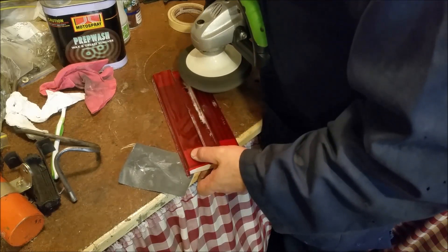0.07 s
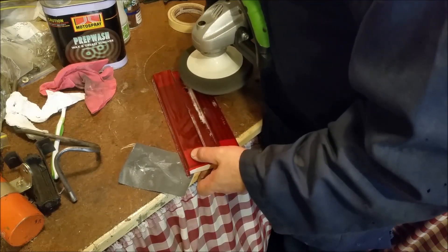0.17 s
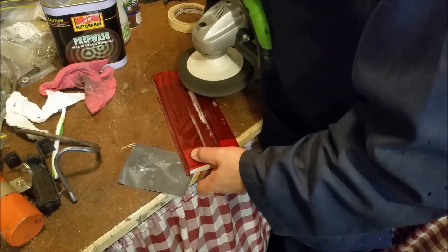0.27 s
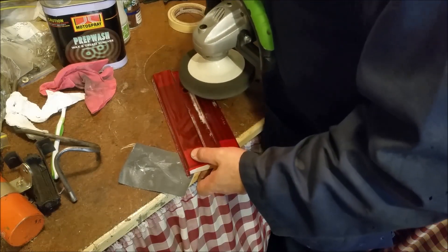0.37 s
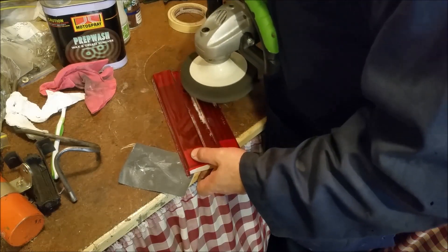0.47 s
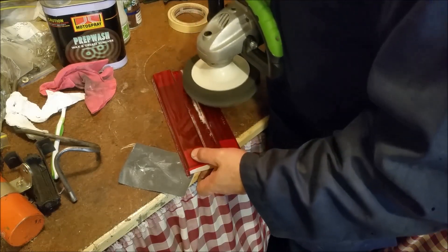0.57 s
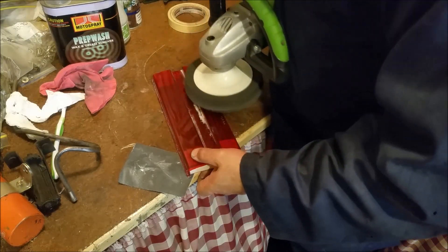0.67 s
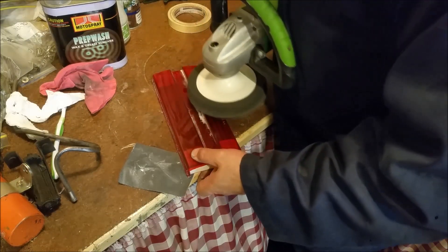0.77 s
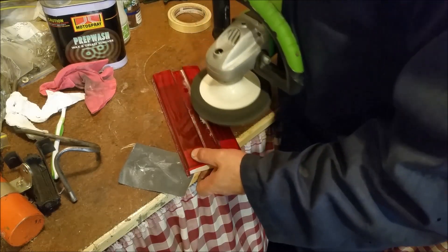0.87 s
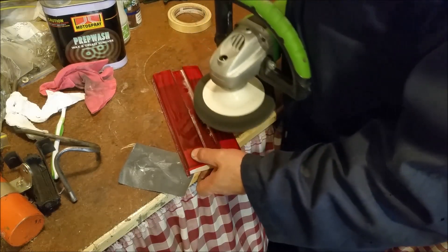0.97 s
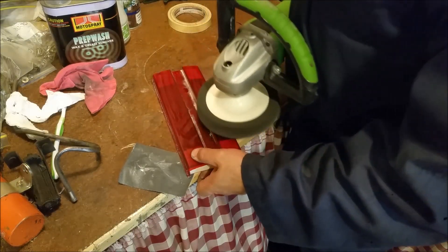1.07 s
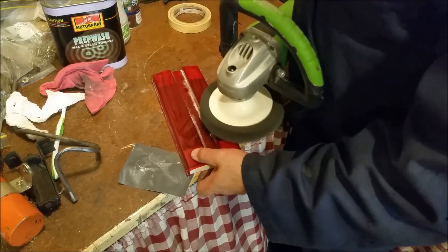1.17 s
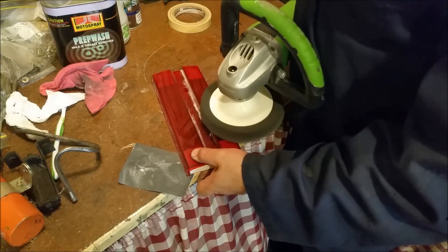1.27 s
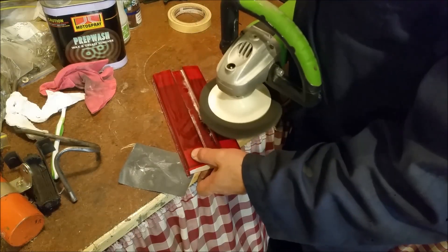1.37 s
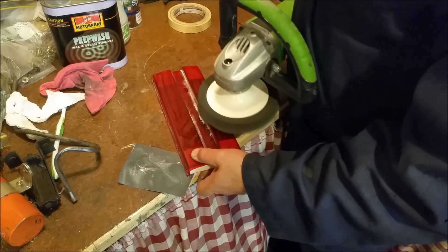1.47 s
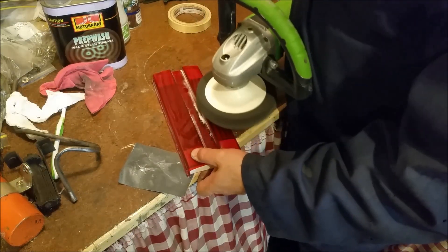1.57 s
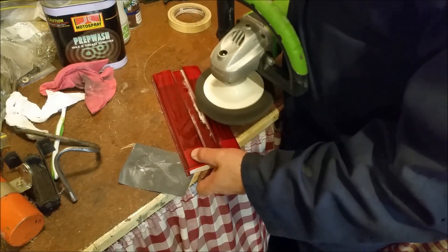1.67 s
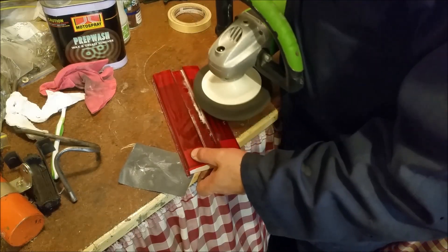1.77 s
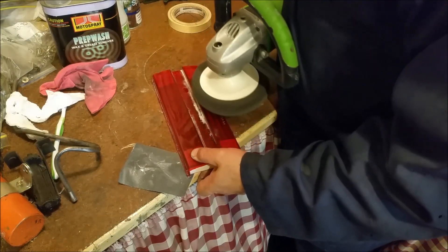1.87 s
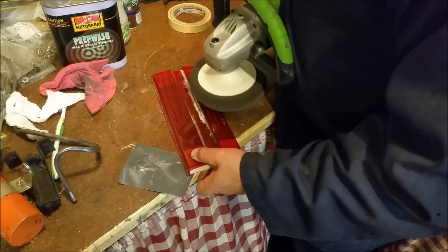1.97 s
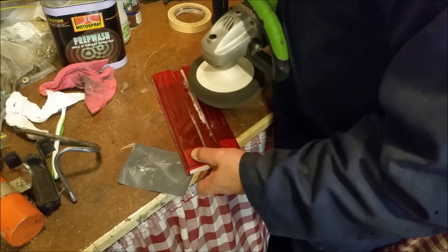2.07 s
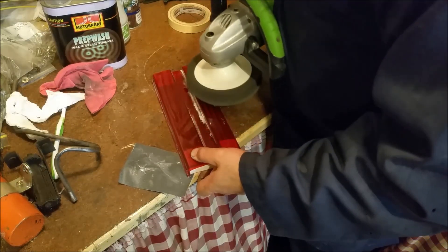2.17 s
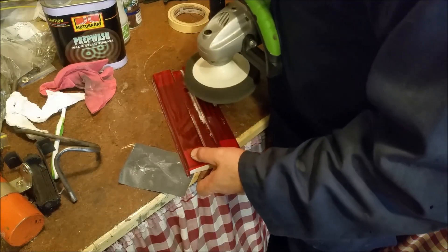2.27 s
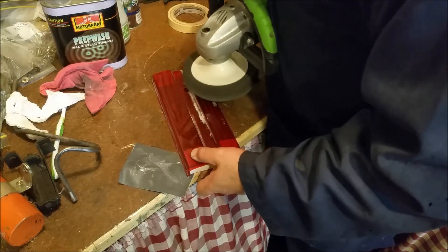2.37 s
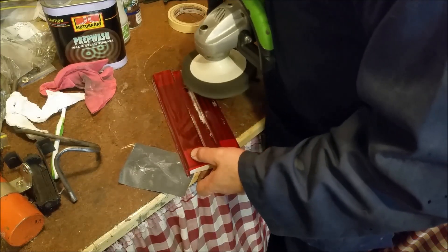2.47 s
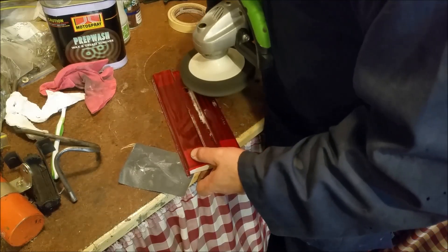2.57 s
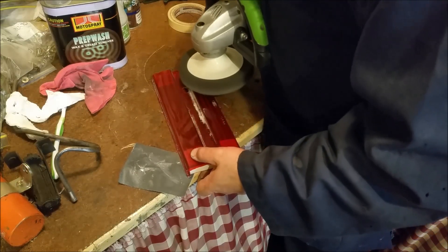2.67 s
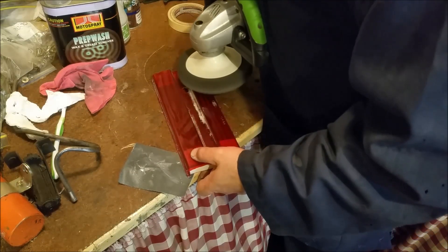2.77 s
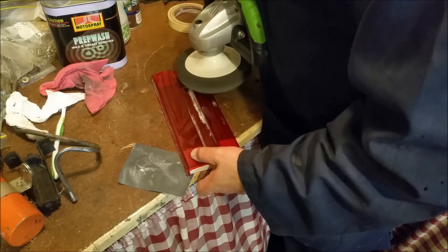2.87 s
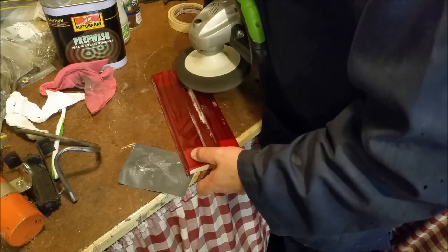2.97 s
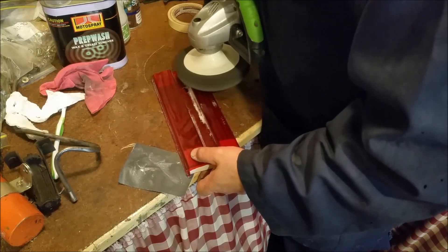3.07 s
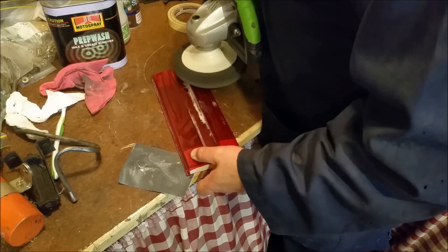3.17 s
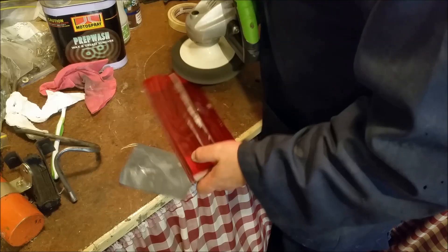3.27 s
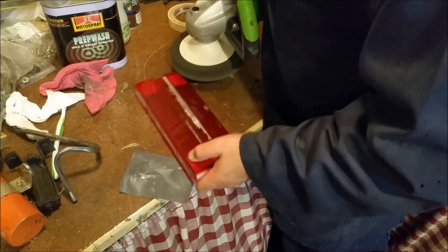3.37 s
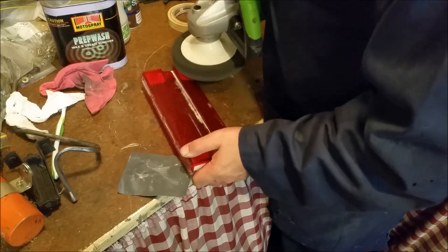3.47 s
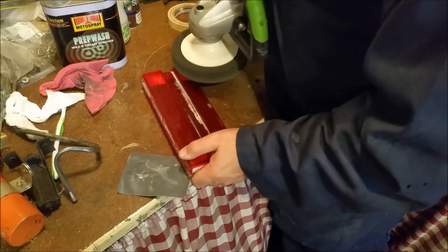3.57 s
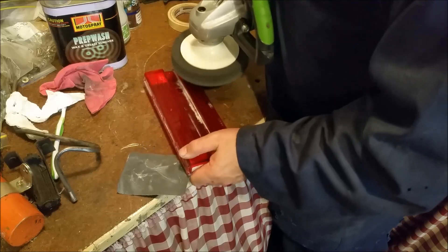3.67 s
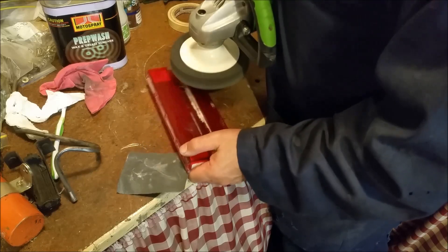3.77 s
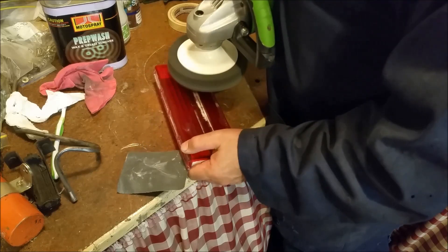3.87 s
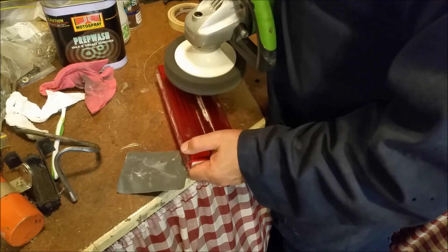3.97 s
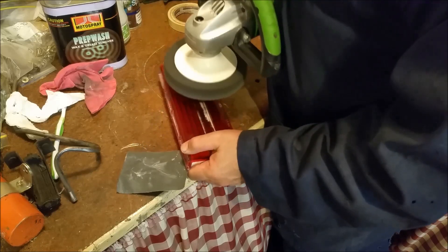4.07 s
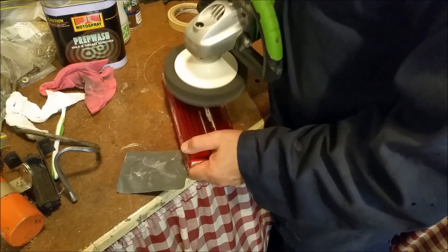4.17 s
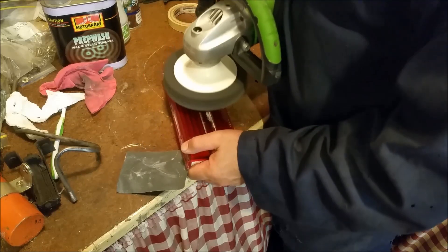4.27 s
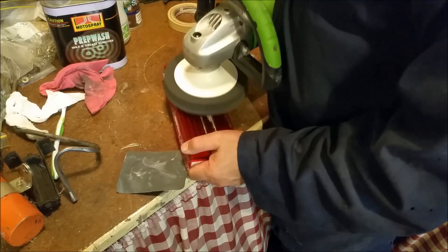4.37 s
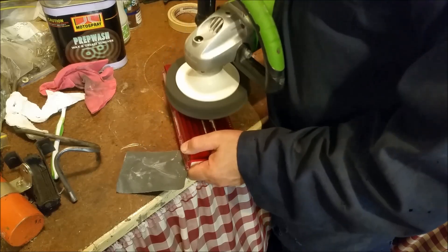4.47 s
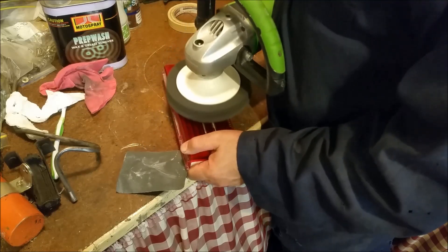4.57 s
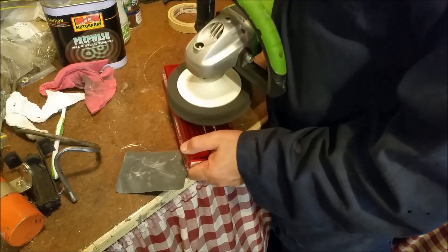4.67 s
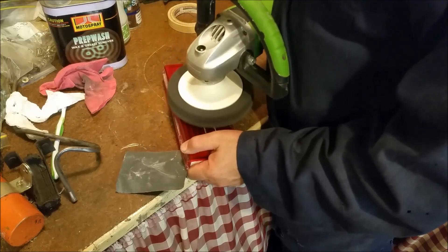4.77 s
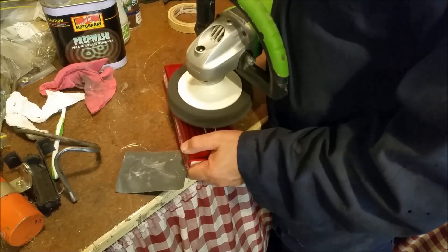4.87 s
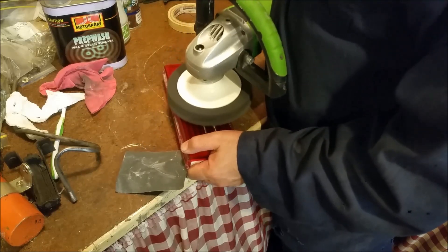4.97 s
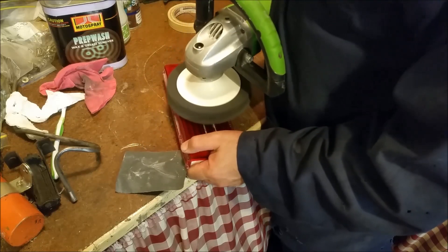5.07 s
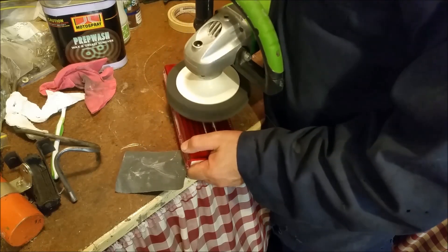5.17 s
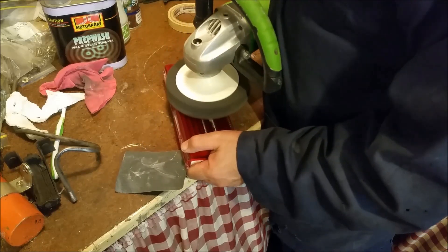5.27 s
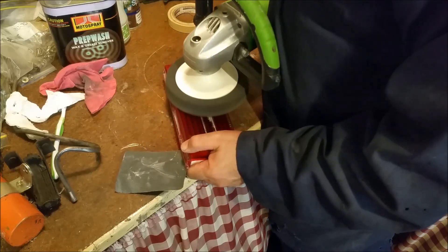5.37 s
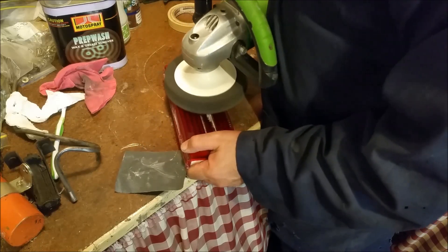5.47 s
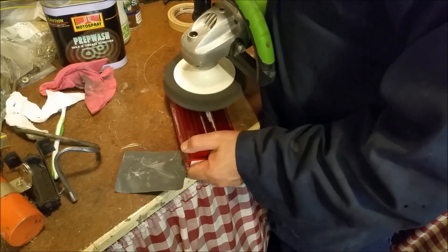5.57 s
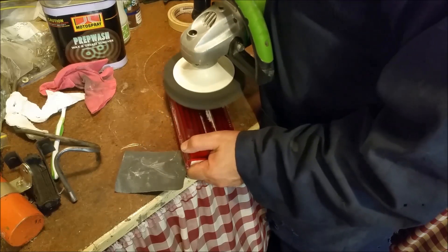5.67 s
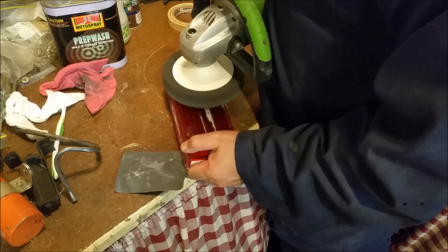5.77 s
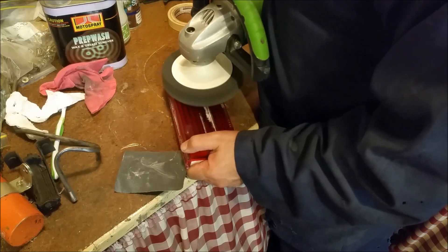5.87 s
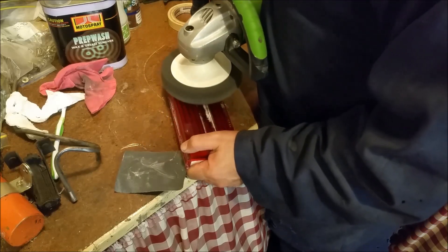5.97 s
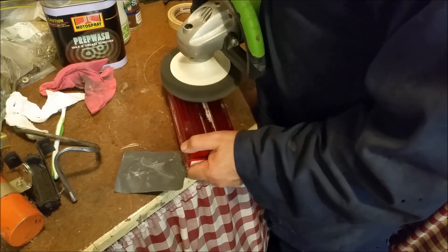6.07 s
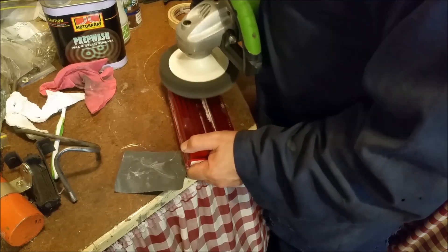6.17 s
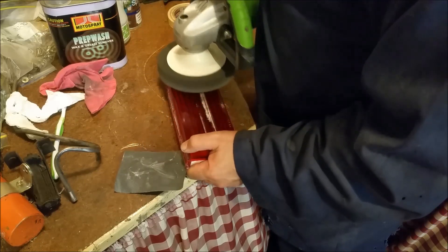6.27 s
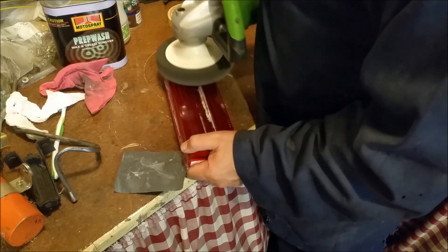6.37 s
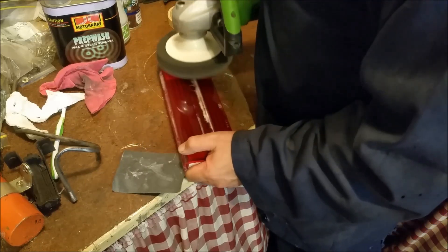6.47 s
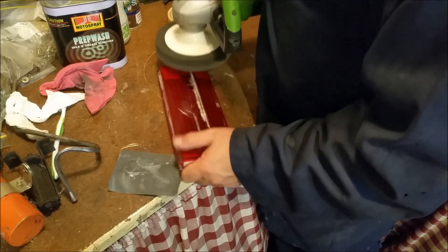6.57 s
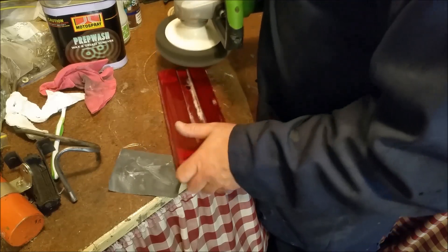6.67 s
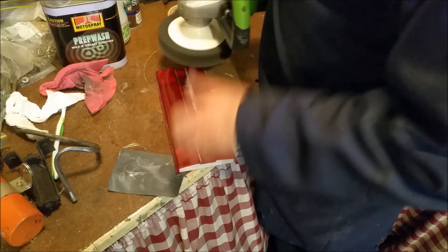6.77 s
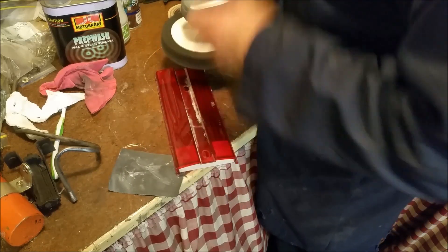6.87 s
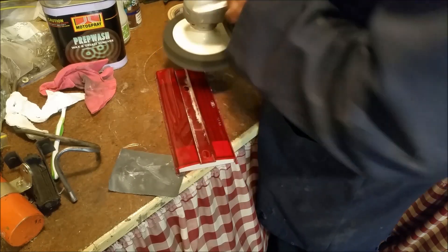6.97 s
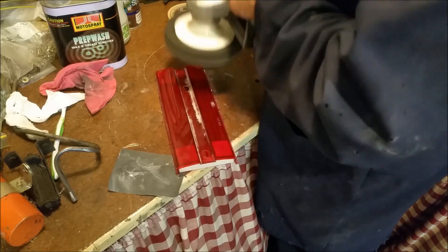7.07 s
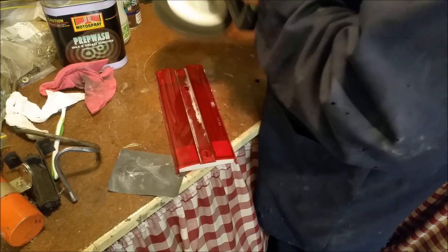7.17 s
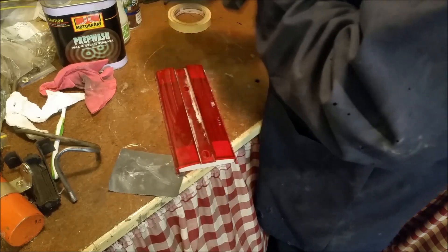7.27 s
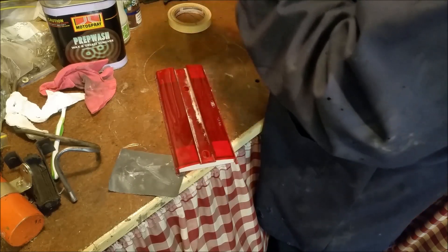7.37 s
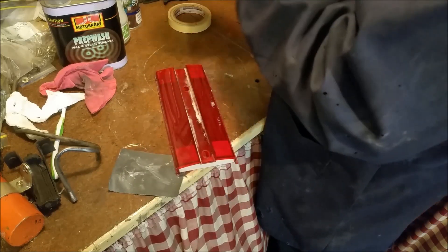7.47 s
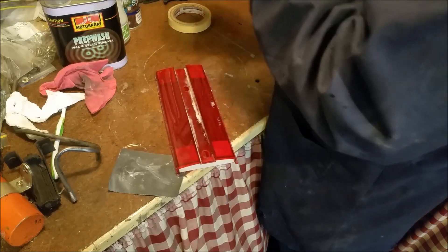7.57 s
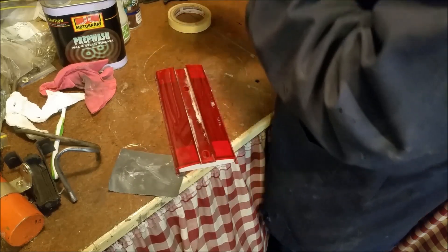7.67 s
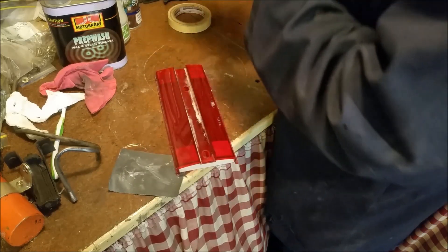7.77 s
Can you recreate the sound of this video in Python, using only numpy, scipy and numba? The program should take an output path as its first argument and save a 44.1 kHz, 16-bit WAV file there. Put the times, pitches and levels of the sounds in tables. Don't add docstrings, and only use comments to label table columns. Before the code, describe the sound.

Close, steady motor whine and airy buzz of a polisher, sped up midway, ending with sharp plastic knocks, ticking gears and a falling whirr.

```python
import sys
import numpy as np
from scipy import signal
from scipy.fft import rfft, irfft
from scipy.io import wavfile
from scipy.ndimage import uniform_filter1d
from numba import njit

SR = 44100
rng = np.random.default_rng(int(sys.argv[2]) if len(sys.argv) > 2 else 0)


def transcribe(u):
    v = np.clip(np.atleast_2d(u).T, -1, 1)
    q = np.round(v * 32767).astype(np.int16)
    wavfile.write(sys.argv[1], SR, q)


def gain_from_decibels(decibels):
    exponent = np.asarray(decibels, float) / 20
    return 10 ** exponent


N = 345303
T = np.arange(N) / SR
GRID = np.arange(int(T[-1] * 200) + 2) / 200

FAST_S, PRESS_S, OFF_S = 3.41, 4.44, 6.80
MAINS_HZ = 49.93
# t/s, level/dB
COAST_LEVEL = [(6.8, -31.5), (6.85, -27), (6.96, -34.5), (7.13, -37), (7.2, -42), (7.28, -40.5),
               (7.54, -42), (7.79, -48.5), (7.83, -47)]


def level(x, db):
    return x * gain_from_decibels(db) / np.sqrt(np.mean(x ** 2))


def across(table):
    hz, value = np.transpose(table)
    return np.interp(np.log(np.arange(N // 2 + 1) * SR / N + 1), np.log(hz), value)


def tint(x, gain):
    return irfft(rfft(x) * gain, N)


def walk(rate, count=1):
    k = max(int(200 / rate), 1)
    steps = uniform_filter1d(rng.standard_normal((count, len(GRID))), k)
    return uniform_filter1d(steps, k) * np.sqrt(1.5 * k)


def fine(coarse):
    return np.interp(T, GRID, coarse)


def bell(x, centre, width):
    return np.exp(-((x - centre) / width) ** 2)


def pair_noise():
    # f/Hz, left-right likeness/0-1
    likeness = [(60, 0.6), (130, 0.85), (290, 0.97), (640, 0.97), (1410, 0.3), (3100, 0.05), (6820, 0.04),
                (15000, -0.01)]
    like = np.clip(across(likeness), 0, 1)
    mid, side = rng.standard_normal((2, N)) * np.sqrt(SR / 4)
    mid = tint(mid, np.sqrt(1 + like))
    side = tint(side, np.sqrt(1 - like))
    return np.array([mid + side, mid - side])


@njit
def sing(turns, order, size, shift):
    out = np.empty((2, len(turns)))
    for c in range(2):
        for i in range(len(turns)):
            place = i * 200 / SR
            k = int(place)
            u = place - k
            phase = 2 * np.pi * order * turns[i] + shift[c, k] + u * (shift[c, k + 1] - shift[c, k])
            out[c, i] = (size[c, k] + u * (size[c, k + 1] - size[c, k])) * np.sin(phase)
    return out


def line(turns, order, db, fade_db, lag):
    wander = walk(6, count=4)
    ear = np.array([[1.], [-1.]])
    size = np.sqrt(2) * gain_from_decibels(db + fade_db * wander[1] + ear * .9 * wander[2])
    shift = .3 * wander[0] + ear * (lag + .13 * fade_db * wander[3])
    return sing(turns, float(order), size, shift)


def shaft():
    # t/s, shaft f/Hz
    speed = [(0.0, 159.4), (0.4, 162.1), (1.02, 169.8), (1.53, 172.3), (2.04, 170.3), (2.55, 164.4),
             (2.97, 160.9), (3.23, 161.4), (3.34, 164.2), (3.51, 176.1), (3.91, 197.0), (4.42, 212.1),
             (4.76, 213.5), (5.27, 203.9), (5.86, 194.4), (6.38, 189.7), (6.63, 194.8), (6.79, 200.0)]
    s, hz = np.transpose(speed)
    slope = np.gradient(hz, s, edge_order=2)
    i = np.clip(np.searchsorted(s, T) - 1, 0, len(s) - 2)
    h = s[i + 1] - s[i]
    u = np.clip((T - s[i]) / h, 0, 1)
    rise = hz[i + 1] - hz[i]
    bend = (1 - u) * (slope[i] * h - rise) - u * (slope[i + 1] * h - rise)
    powered = (1 - u) * hz[i] + u * hz[i + 1] + u * (1 - u) * bend
    since = np.clip(T - s[-1], 0, None)
    coast = 203.7 - 75.7 * since + 7.5 * since ** 2
    return np.where(since > 0, np.minimum(powered, coast), powered)


def whine(turns, hz, effort_db):
    sung = [(1, -63, -59.5, -61, -67), (9, -38, -54, -50.5, -48), (15, -35, -57, -42.5, -61),
            (18, -41, -46, -36.5, -59), (19, -39.5, -54, -49, -63), (21, -37, -62, -42, -65),
            (24, -35, -38, -39.5, -40), (28, -43.5, -54, -35, -68), (30, -41, -46, -40, -66)]
    # f/Hz, width/Hz, level/dB
    housing = [(1559, 57, 8), (2470, 42, 5), (2567, 46, 7.5), (2962, 56, 10.5), (3065, 40, 6),
               (3635, 28, 6.5), (3794, 71, 6), (4268, 88, 13), (4102, 80, 6), (4440, 80, 9.5),
               (4462, 95, 3.5), (4530, 41, 10), (4950, 50, 5), (5076, 48, 6)]
    lags = (.05, .5, .15, .1, .3, -.3, .55, -.5, .5)
    lift_s, release_s = 3.38, 6.6
    edge_hz, edge_db_per_khz = 5060, -25
    beat_s, beat_first_s, beat_db = .19, 7.045, -10
    coast_s, coast_db = COAST_LEVEL[2]
    at = [lift_s - .15, lift_s + .17, PRESS_S - .15, PRESS_S + .17,
          release_s - .08, release_s + .07, OFF_S, OFF_S + .15]
    speed = np.interp(GRID, T, hz)
    fading = np.interp(GRID, T, effort_db) - coast_db
    powered, coasting = GRID < OFF_S, GRID > coast_s
    out = np.zeros((2, N))
    for (order, slow, lifted, pressed, coast), lag in zip(sung, lags):
        db = np.interp(GRID, at, [slow, lifted, lifted, pressed, pressed, lifted, lifted, coast])
        pitch = order * speed
        swell = sum(g * bell(pitch, centre_hz, width) for centre_hz, width, g in housing)
        db += swell * np.where(powered, 1, .4)
        db += edge_db_per_khz * np.clip(pitch - edge_hz, 0, None) / 1000 * powered
        db += .12 * fading * coasting
        beat = np.cos(np.pi * (GRID - beat_first_s) / beat_s) ** 8
        db += beat_db * (order > 13.5) * coasting * beat
        out += line(turns, order, db, .8, lag)
    return out


def machine(turns, noise_db, rumble_db, hiss_db):
    lesser = [(3, 9, 16, 9), (4, 12, 17, 11), (6, 14, 17, 13), (7, 9, 20, 9), (11, 18, 23, 14),
              (13, 14, 17, 20), (14, 16, 16, 19), (16, 17, 9, 20), (17, 13, 18, 12), (20, 20, 20, 16),
              (22, 9, 15, 18), (23, 13, 16, 19), (25, 21, 15, 21), (27, 19, 18, 21), (29, 20, 15, 15),
              (31, 18, 23, 17), (32, 16, 24, 16), (33, 20, 16, 18), (36, 19, 17, 24), (39, 17, 13, 19),
              (41, 21, 20, 14), (42, 20, 19, 9), (48, 18, 25, 26), (53, 12, 14, 19), (57, 18, 14, 16),
              (58, 9, 13, 21), (60, 16, 20, 20), (62, 19, 22, 14), (63, 14, 14, 20), (72, 19, 19, 19)]
    # f/Hz, density/dB per Hz
    colour = [(24, -67), (40, -40.5), (71, -49), (179, -25.5), (247, -31), (417, -14.5), (548, -16.5),
              (1020, -10.5), (1770, -6.5), (2330, 1.5), (3380, -8), (4680, -2), (6000, -23), (11500, -26.5),
              (15500, -39)]
    # f/Hz, level/dB
    top_edge = [(4400, 0.5), (5150, 2), (5600, -1.5), (6300, -1)]
    source = pair_noise()
    lags = rng.uniform(-1.2, 1.2, len(lesser))
    at = [FAST_S - .1, FAST_S + .12, OFF_S, OFF_S + .15]
    for (order, slow, fast, coast), lag in zip(lesser, lags):
        db = np.interp(GRID, at, [slow, fast, fast, coast + .79])
        source += line(turns, order, db + 1.5 - order / 16, 2 + order / 25, lag)
    body = gain_from_decibels(across(colour) + across(top_edge))
    low = np.clip(across([(1300, 1), (2000, 0)]), 0, 1)
    high = np.clip(across([(5200, 0), (6200, 1)]), 0, 1)
    bass = np.clip(across([(110, 1), (170, 0)]), 0, 1)
    flutter = .6 * walk(9, count=3) + .4 * walk(4)
    air = level(tint(source, body * (1 - low - high)), .63)
    rumble = level(tint(source, body * (low - bass)), .24)
    hiss = level(tint(source, body * high), 2.02)
    bench = level(tint(source, body * bass), -62.5)
    bench_db = np.interp(T, [FAST_S - .2, FAST_S + .2, OFF_S, OFF_S + .45], [0, -5.5, -8, -19])
    out = air * gain_from_decibels(noise_db + fine(flutter[0]))
    out += rumble * gain_from_decibels(rumble_db + fine(flutter[1]))
    out += bench * gain_from_decibels(bench_db)
    return out + hiss * gain_from_decibels(hiss_db + 1.03 * fine(flutter[2]))


def stator(turns, ring_db):
    # f/Hz, width/Hz, level/dB
    modes = [(2386, 89, 8), (2390, 100, -21), (2055, 40, -8), (2090, 27, -18)]
    slots, fire_s = 12, 4.0072
    cycle = (T - fire_s) * MAINS_HZ
    half = (2 * cycle) % 1
    pull = np.exp(-half / .19) * (1 - np.exp(-half / .11)) * np.where(cycle % 1 < .5, 1, .66)
    pull = np.where(T < OFF_S, pull * gain_from_decibels(fine(1.2 * walk(30)[0])), .04)
    drive = pull * np.cos(2 * np.pi * slots * turns + fine(.1 * walk(20)[0]))
    ring = np.zeros(N)
    for hz, width, db in modes:
        ring += gain_from_decibels(db) * signal.lfilter(*signal.iirpeak(hz, hz / width, SR), drive)
    ring /= np.sqrt(uniform_filter1d(ring ** 2, int(.12 * SR)) + 1e-9)
    ring *= gain_from_decibels(ring_db - 1.5 + (T > OFF_S) * fine(3 * walk(9)[0]))
    return np.array([ring, np.roll(ring, 1)])


def hum():
    overtones = [(6, -60), (8, -54), (10, -54)]
    return sum(line(MAINS_HZ * T, k, db - 60 * (GRID > OFF_S), 2.6, .088) for k, db in overtones)


def room(x):
    t60_s, tail_db = .3, -14
    t = T[:SR // 2]
    tail = rng.standard_normal((2, len(t))) * 1000. ** (-t / t60_s) * (t > .003)
    tail *= gain_from_decibels(tail_db) / np.sqrt(np.sum(tail ** 2, axis=1, keepdims=True))
    return x + signal.fftconvolve(x.mean(axis=0, keepdims=True), tail, axes=1)[:, :N]


def garage():
    # f/Hz, density/dB per Hz
    bed = [(15, -53), (25, -23), (140, -26), (215, -36), (721, 11), (1900, -28), (3720, 12), (5880, -7),
           (15500, -12)]
    return level(tint(pair_noise(), gain_from_decibels(across(bed))), -40.5)


def lens():
    # t/s, peak level/dB, pitch factor, contact/ms, bounces within 25 ms
    knocks = [
        (6.7335, -8, .86, .06, 0),
        (6.7655, -10, .8, .2, 0),
        (6.7905, -14, 1.0, .12, 0),
        (6.8095, -11, 1.0, .3, 0),
        (6.8125, -4, 1.0, .1, 0),
        (6.848, -16, 1.0, .5, 2),
        (6.857, -8, 1.0, .55, 2),
        (6.866, -10, 1.0, .3, 1),
        (6.885, -16, .95, .3, 0),
        (6.938, -26, .9, .06, 0),
    ]
    # f/Hz, level/dB, t60/s
    modes = [(55, -36, .15), (312, -23, .08), (520, -23, .04), (870, -8, .05), (1130, -7, .02),
             (1330, 0, .035), (1545, -12, .025), (1820, -6, .035), (2213, -11, .02), (3100, -8, .01),
             (4300, -8, .012), (5200, -9, .01)]
    out, t = np.zeros(N), T[:SR // 4]
    chance = rng.uniform(0, 1, (len(knocks), 6 + len(modes)))
    for (s, db, pitch, contact_ms, bounces), c in zip(knocks, chance):
        ring = np.zeros(len(t))
        for (hz, g, t60), u in zip(modes, c[6:]):
            ring += gain_from_decibels(g + 5 * (u - .5)) * np.sin(2 * np.pi * hz * pitch * t) * 1000. ** (-t / t60)
        push = np.exp(-.5 * (t[:64] * 1000 / contact_ms * 4 - 3) ** 2)
        ring = np.convolve(ring * (1 - np.exp(-t / .0003)), push)[:len(t)]
        ring *= gain_from_decibels(db) / np.abs(ring).max()
        for k in range(int(round(bounces)) + 1):
            delay_s = 0 if k == 0 else .003 + .014 * c[k]
            strength = 1 if k == 0 else .3 + .4 * c[k + 2]
            i = int((s + delay_s) * SR)
            out[i:i + len(t)] += ring * strength
    out = signal.sosfilt(signal.butter(2, 150, "high", fs=SR, output="sos"), out)
    return np.array([out, np.roll(out, 2)])


def gearbox():
    # t/s, peak level/dB
    ticks = [
        (6.8528, -27),
        (6.8947, -21),
        (6.9391, -22),
        (7.2574, -25),
        (7.3003, -24),
        (7.3794, -22),
        (7.7343, -32),
        (7.7844, -32),
    ]
    # f/Hz, level/dB, t60/s
    modes = [(4850, 0, .012), (4300, -6, .01), (3650, -8, .01)]
    out, t = np.zeros(N), T[:SR // 20]
    ring = sum(gain_from_decibels(db) * np.sin(2 * np.pi * hz * t) * 1000. ** (-t / t60) for hz, db, t60 in modes)
    ring *= 1 - np.exp(-t / .0004)
    for s, db in ticks:
        i = int(s * SR)
        out[i:i + len(t)] += (gain_from_decibels(db - 4) * ring)[:N - i]
    return out


def scene():
    # t/s, effort level of pad and fan/dB, pull of the current on the stator/dB
    load = [(0.0, -23, -29), (0.57, -22.5, -28), (0.8, -23.5, -28), (1.09, -22, -29), (1.77, -23, -24),
            (2.3, -23.5, -26.5), (3.18, -22, -28.5), (3.5, -24, -28), (3.75, -24.5, -17.5),
            (4.42, -23, -21), (4.9, -20, -26.5), (5.25, -21.5, -23), (5.45, -22.5, -16.5),
            (5.8, -22.5, -19.5), (6.13, -22.5, -21), (6.5, -21.5, -21.5), (6.68, -25, -18),
            (6.79, -25.5, -20.5)]
    hz = shaft()
    turns = np.cumsum(hz) / SR
    at, effort, pull = np.transpose(load)
    on = T < OFF_S
    effort_db = np.where(on, np.interp(T, at, effort), np.interp(T, *np.transpose(COAST_LEVEL)))
    rumble_db = effort_db + np.interp(T, [FAST_S, PRESS_S, OFF_S, OFF_S + .1], [-9.5, -8.5, -8.5, -4])
    rumble_db += 5 * bell(T, 3.4, .073)
    hiss_db = effort_db + np.where(on, -18 + .0641 * (hz - 164.6), -11.5)
    last_ring_db = 19 * bell(T, 6.91, .026)
    ring_db = np.where(on, np.interp(T, at, pull), effort_db - 8.5 + last_ring_db)
    motor = machine(turns, effort_db, rumble_db, hiss_db) + stator(turns, ring_db) + hum()
    near = room(motor + lens() + gearbox())
    return near + whine(turns, hz, effort_db) + garage()


def low_pass(x):
    return signal.sosfilt(signal.butter(12, 15630, fs=SR, output="sos"), x)


def record(dry):
    # f/Hz, left minus right level/dB
    port_lean = [(60, 5), (110, 5), (200, 1.5), (380, 4), (700, 2.5), (1290, 4.5), (2380, 5), (4400, 8),
                 (8120, -4), (15000, 2)]
    lean = across(port_lean) / 2
    ports = np.array([tint(dry[0], gain_from_decibels(lean)), tint(dry[1], gain_from_decibels(-lean))])
    return low_pass(np.tanh(.61 * ports) / .59)


dry = scene()
out = record(dry)
transcribe(out)
```